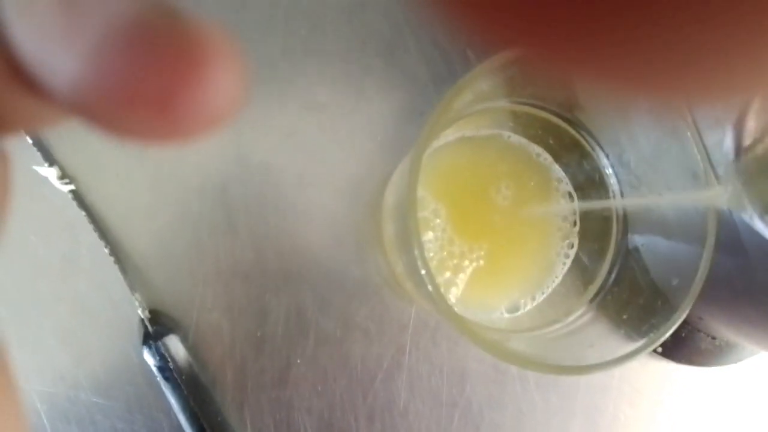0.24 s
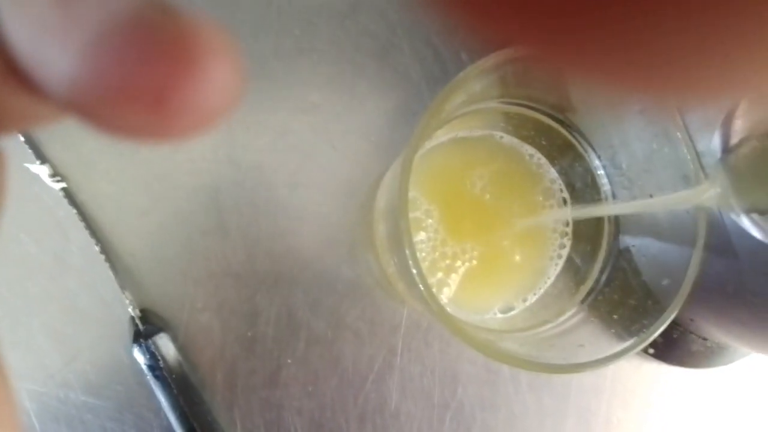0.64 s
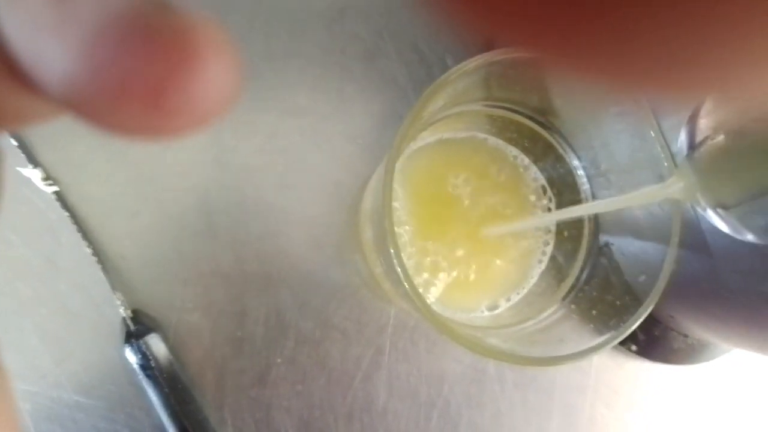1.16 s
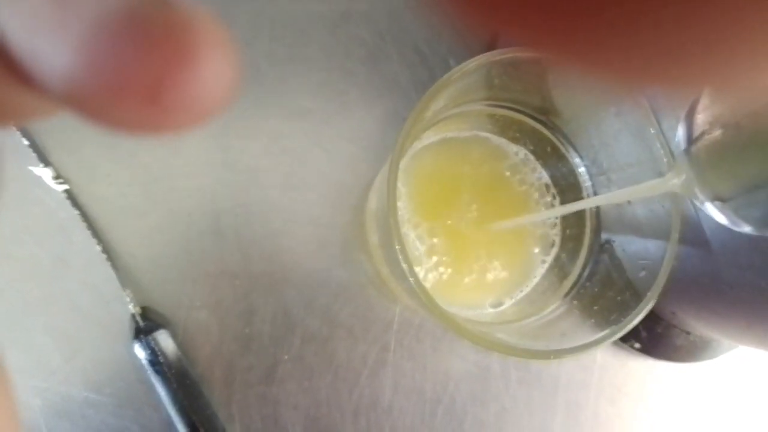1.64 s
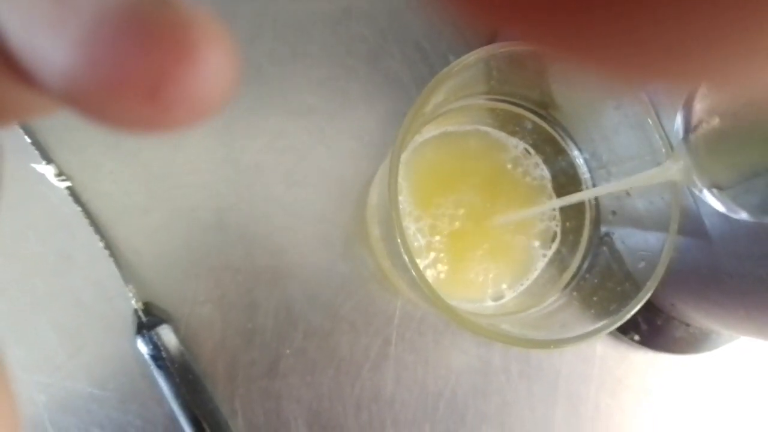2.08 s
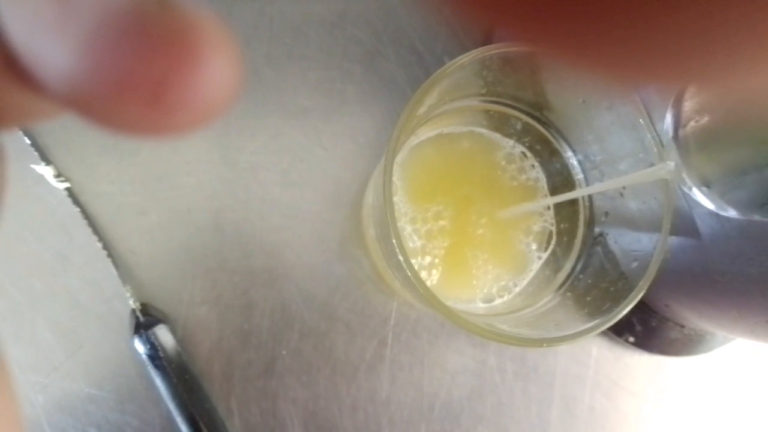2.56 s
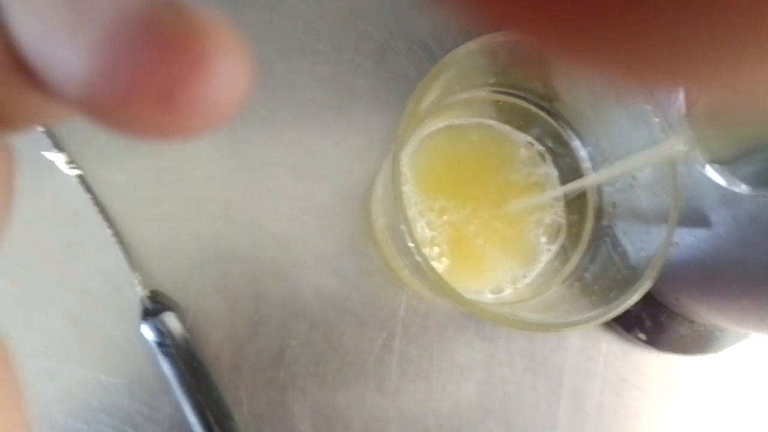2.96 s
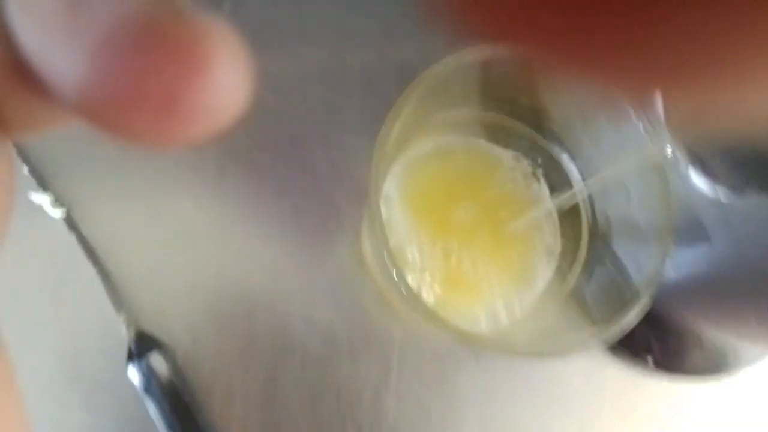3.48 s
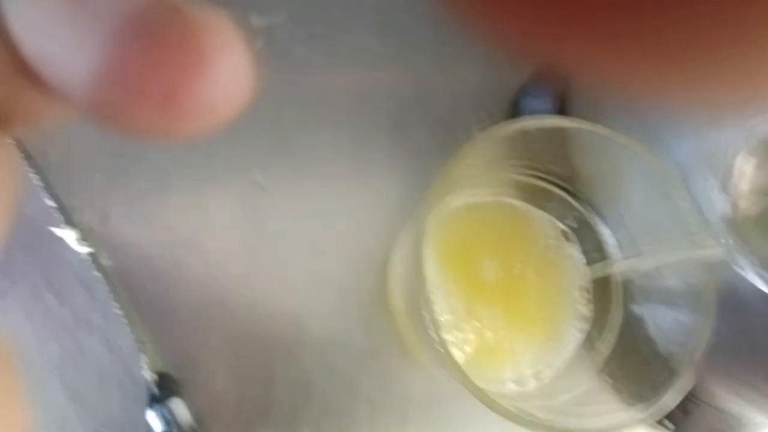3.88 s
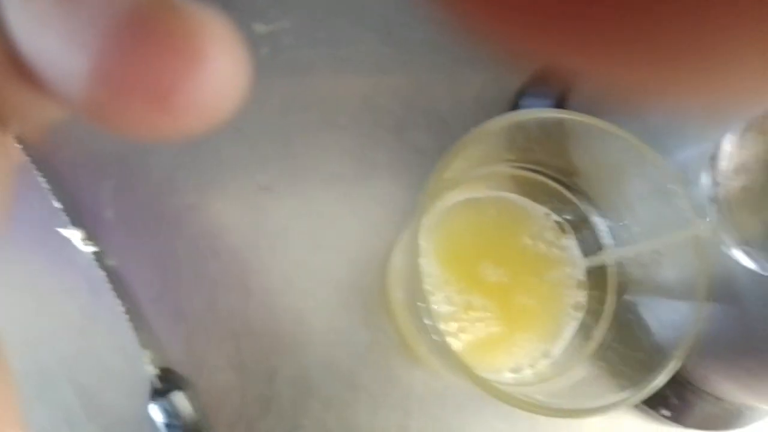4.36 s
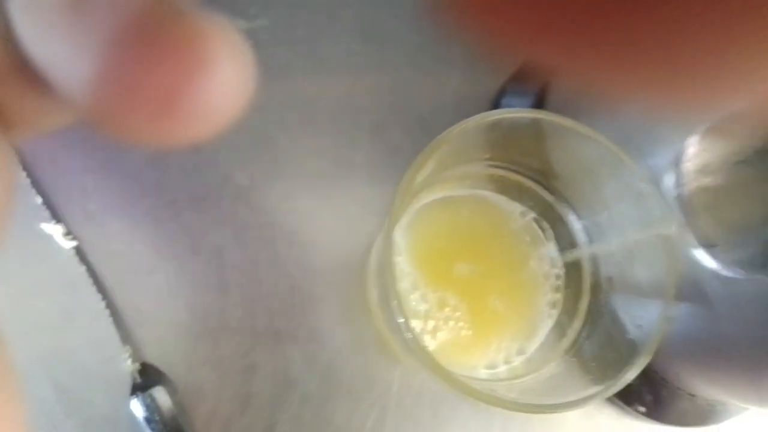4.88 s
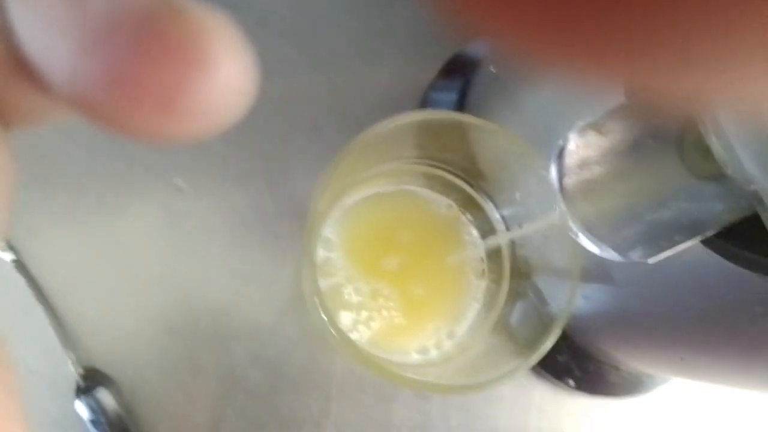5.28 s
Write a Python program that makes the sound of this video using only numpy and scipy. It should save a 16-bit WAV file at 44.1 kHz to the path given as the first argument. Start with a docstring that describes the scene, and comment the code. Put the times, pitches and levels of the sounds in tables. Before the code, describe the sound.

Close mono sound of a juicer on a steel worktop: gear whine, loose rattling teeth, dull knocks and crackling juice under a hand pressing fruit. A bright squelch opens it and another accompanies the stop near three seconds. Then near quiet, a brief cluster of bumps, scattered drops and froth pops, faint glass ringing and low room noise that swells slightly towards the end.

```python
"""Electric citrus juicer

A juicer runs for three seconds on a steel worktop in a small kitchen, then is bumped and rocks.
Gear meshing gives a whine from sine tones; loose teeth are random impulses exciting the housing modes.
The reamer tears wet pulp at the start and again around the stop: filtered grains in moving resonances.
Juice crackles, fizzes and drips into a glass: bursting bubbles are resonant pulses, and the faintly
ringing glass is a set of decaying sines. Soft room noise lies beneath.
"""
import sys
import numpy as np
from scipy import signal
from scipy.fft import rfft, irfft, next_fast_len
from scipy.io import wavfile
from scipy.ndimage import map_coordinates

SR = 44100
rng = np.random.default_rng(int(sys.argv[2]) if len(sys.argv) > 2 else 0)


def bounce(signal):
    """Save signal as a 16-bit WAV file at the path given by the first command-line argument."""
    frames = np.transpose(np.atleast_2d(signal))
    limited = np.clip(frames, -1, 1)
    pcm = np.round(limited * 32767).astype(np.int16)
    wavfile.write(sys.argv[1], SR, pcm)


N = 244311
TIME = np.arange(N) / SR
CUTOFF_HZ = 15650

# Spectrum of the room noise: [f/Hz, relative level/dB per Hz]
BACKGROUND_COLOUR = [(30, -73), (74, -10), (168, -26.5), (238, 1), (415, -3), (1050, -6.5), (1630, -13),
                     (2500, -24.5), (5500, -75)]
# Modes of the glass rung by the trickle: [t/s, f/Hz, level/dB, t60/s]
GLASS_RINGS = [(3.89, 4100, -70, 0.82), (3.936, 1555, -64.5, 1.7), (4.062, 3100, -67, .55),
               (4.384, 1553, -62, 0.48), (5.465, 6520, -66, .8)]
# Brief thickenings of the trickle: [t/s, half length/s, hiss level/dB]
GUSHES = [(4.327, 0.15, -70.5), (4.71, 0.047, -66)]
# Spectra of the crackling stream and of the froth: [f/Hz, relative level/dB per Hz]
CRACKLE = [(2500, -5), (4500, -1.5), (8000, 6.5), (11000, -2.5), (15500, 1)]
FIZZ = [(1060, -47), (1800, -8.5), (2950, -0.5), (4200, 2), (5550, -1), (7470, 9.5), (9110, 2),
        (11600, -11.5), (14800, 1), (15500, -29)]
# Course of the froth's fizz: [t/s, relative level/dB]
FROTH = [(3.38, -66.5), (3.95, -64), (4.15, -63.5), (4.32, -62), (4.5, -66), (4.71, -62), (5.04, -61.5),
         (5.16, -56.5), (5.54, -63)]
# Drops trapping a bubble: [t/s, level/dB, final f/Hz, share by which the pitch starts lower]
DROPS = [(3.095, -41, 3130, 0.056), (3.098, -50, 4600, 0.061), (3.135, -51, 3950, 0.071),
         (3.184, -47, 3150, .03), (3.212, -47, 1144, 0.093), (3.773, -51.5, 1600, .03),
         (3.842, -52.5, 3240, 0.26), (3.883, -58, 3480, 0.16), (3.938, -58, 1644, .03),
         (3.995, -53, 1205, 0.059), (4.07, -59, 2670, 0.2), (4.156, -57, 3480, 0.22),
         (4.766, -58, 2830, 0.5), (5.263, -59, 2450, .1)]
# Wet snaps of pulp and bursting froth: [t/s, click level/dB, ring level/dB, ring f/Hz]
SNAPS = [(0.105, -50, -22, 5700), (0.204, -32, -22.5, 6200), (0.2123, -27, -16, 6930),
         (0.251, -40, -37, 9200), (0.32, -47, -21.5, 7760), (0.364, -35, -28.5, 3620),
         (0.547, -38, -29, 7700), (0.63, -30, -31, 5200), (0.641, -33, -32, 5080),
         (0.647, -26, -27.5, 4950), (0.655, -35, -31, 5100), (0.767, -31, -33, 7000),
         (0.8918, -20.5, -25, 8340), (1.074, -39, -37.5, 6800), (1.309, -48, -33, 8700),
         (1.333, -50, -32.5, 9440), (1.7487, -27, -36, 8700), (1.907, -37, -30, 8210),
         (2.295, -17, -28, 8200), (2.347, -24.5, -30, 13330), (2.3817, -31, -40, 4800),
         (2.4297, -29, -33, 12300), (2.902, -43, -35, 7810), (2.993, -32, -27, 8400),
         (3.2378, -34, -35, 5300), (3.288, -32.5, -50, 7600), (3.387, -44, -46, 8700),
         (3.4402, -30, -30, 7930), (3.515, -32.5, -38, 8400), (3.52, -41, -60, 5200),
         (3.6005, -40, -43, 8300), (3.6613, -48, -37.5, 7800), (3.6926, -29.5, -43, 7500),
         (3.734, -36, -49, 6800), (3.774, -40, -48, 9200), (3.868, -37.5, -42, 13300),
         (3.9225, -43.5, -50, 14000), (4.073, -61, -39, 5700), (4.355, -38, -42, 6560),
         (5.11, -56, -41.5, 9200), (5.326, -31, -48, 4350), (5.469, -43, -44, 13600)]
# Squeaks of the reamer under the hand and as it comes to rest:
# [t/s, length/s, f/Hz, starting level/dB, fade/dB]
SQUEAKS = [(1.963, 0.23, 1996, -55, 12), (3.08, 0.22, 1413, -43, 20)]
# Touches as the juicer rocks on the worktop: [t/s, thud level/dB, clack level/dB]
BUMPS = [(3.687, -34.5, -52), (3.7, -33, -51), (3.708, -35, -51), (3.7119, -61, -33.5), (3.725, -35.5, -49),
         (3.743, -62, -38.5), (3.76, -48, -52), (3.782, -35.5, -47), (3.814, -48, -50)]
# Low and high modes of the rocking juicer: [f/Hz, relative level/dB, t60/s]
THUD_MODES = [(228, -15, 0.14), (289, -12, 0.16), (346, 1.5, 0.08), (427, -9.5, 0.083), (513, -1, 0.059),
              (595, -11, 0.055)]
CLACK_MODES = [(873, -13.5, 0.08), (1054, -2.5, 0.041), (1100, 0, 0.026)]
# Knocks of the reamer and gears under load: [t/s, peak level/dB, f/Hz]
KNOCKS = [(.53, -27, 1180), (0.568, -26, 1100), (.574, -32.5, 515), (.664, -35, 476), (.699, -33, 565),
          (.728, -34, 720), (0.875, -24.5, 1150), (0.906, -25.5, 941), (1.22, -39, 1593),
          (1.262, -27.5, 1150), (1.951, -29.5, 1054), (1.985, -25.5, 564), (2.014, -23.5, 1144),
          (2.748, -25.5, 522.3), (2.894, -35.5, 534), (2.954, -29.5, 650), (3.017, -31.5, 1650)]
# Reamer tearing into the fruit: [t/s, length/s, squelch level/dB, wet rasp level/dB]
PRESSES = [(-.06, 0.673, -39, -41), (2.755, 0.32, -36, -40.5)]
# Squelch spectrum of each press: [f/Hz, relative level/dB per Hz]
FIRST_SQUELCH = [(150, -30), (195, 1), (750, 10), (1400, 3), (2000, 2.5), (2800, -3), (3600, -31)]
LAST_SQUELCH = [(160, -24), (230, 2.5), (350, 8), (600, 12), (1000, 8.5), (1700, 7), (2100, -19.5),
                (3800, -7), (4800, -45.5)]
# Resonances of the wet gap between peel and reamer: [f/Hz, width per filter pass/Hz, relative level/dB]
FIRST_RASP = [(4950, 1200, 2), (5100, 1630, 12.5), (7000, 1050, 9.5), (7700, 800, 7), (8470, 380, 4)]
LAST_RASP = [(1990, 71, 21), (2484, 314, 6.5), (3090, 110, 9.5), (3470, 180, 1), (4100, 1200, -2),
             (6020, 340, 15.5), (6980, 150, 19), (7700, 600, 12), (8700, 5400, -7)]
# Hand leaning on the fruit: [t/s, length/s, extra rattle level/dB]
LEANS = [(0.33, 0.34, 3.5), (1.103, 0.21, 2), (1.953, 0.17, 3), (2.793, 0.24, 2.5)]
# Speed of the motor: [t/s, tooth-mesh f/Hz]
SPEED = [(0.0, 1249), (0.08, 1237), (0.43, 1226), (0.9, 1228), (1.07, 1221), (1.81, 1228), (2.83, 1236),
         (3.05, 1248)]
# Tones of the rotor: [multiple of its speed, relative level/dB]
ROTOR_TONES = [(13, -17.5), (16, -30.5), (18, -7.5), (39, -28)]
# Hum of the coils: [multiple of the mains frequency, level/dB]
HUM = [(2, -74), (4, -73), (6, -65)]
# Low and high resonances of the plastic housing: [f/Hz, width per filter pass/Hz, relative level/dB]
HOUSING_LOW = [(238.6, 37, -3), (311, 72, -7.5), (499, 79, 6), (595, 81, 8), (725, 300, -4)]
HOUSING_HIGH = [(877, 156, 3), (1138, 68, 11.5), (1249, 154, -2), (1338, 28, 9.5), (1580, 310, -9),
                (1990, 510, -17.5), (2686, 540, -21), (4970, 1140, -14.5)]

# trickle and room noise swell together towards the end
BACKGROUND_DB = -64.5
SWELL_S, SWELL_RISE_S, SWELL_DB = 4.69, 0.41, 6
GURGLE_DB = -76.5
# juice in the glass: starting level while the reamer turns, thin trickle afterwards
FLOW_DB, TRICKLE_DB, FLOW_GROWTH_DB_PER_S = -59, -71.5, 1.35
# a press swells, weakens as the pulp gives way, and lets go
PRESS_ATTACK_S, PRESS_RELEASE_S = 0.047, 0.096
# cells tear only under firm pressure, so the rasp starts later and ends sooner
RASP_LAG_S, RASP_SHORTER_S, RASP_RELEASE_S = 0.0068, 0.035, 0.058
LEAN_ATTACK_S, LEAN_RELEASE_S = 0.0058, 0.12
# the hand slackens after the first press and the low rumble drops for a moment
SLACK_S, SLACK_LENGTH_S, SLACK_DB = 0.802, 0.16, -7.5
# at switch-off the motor's tones die away fast; the rattle and the flow of juice more slowly
STOP_S, MOTOR_FALL_DB_PER_S = 2.965, 185
COAST_S, RATTLE_FALL_DB_PER_S, FLOW_FALL_DB_PER_S = 0.078, 71, 76
MESH_TEETH, MAINS_HZ, SLOW_GEAR_RATIO = 26, 50, 0.868
# the whine grows as the load drags the speed below its free value
FREE_HZ, WHINE_DB, WHINE_DB_PER_HZ = 1248, -42.5, 0.2728
# the rotor's other tones ease off as the fruit empties, and rise when the hand leans on it
ROTOR_DB, ROTOR_EASE_DB_PER_S, ROTOR_FOLLOWS = -34, 3, 1
# loose teeth rattle in the housing, and the coils hum a little louder under load
RUMBLE_DB, RATTLE_DB, HUM_FOLLOWS = -47.5, -44.5, 0.82


def from_db(db):
    """Logarithmic level: decibels to amplitude gain."""
    return 10 ** (np.asarray(db) / 20)


def rms_one(x):
    """Normalisation: scale to unit rms."""
    return x / np.sqrt(np.mean(x ** 2) + 1e-20)


def in_time(rows):
    """Linear interpolation of a two-column curve at every sample."""
    times, values = np.transpose(rows)
    return np.interp(TIME, times, values)


def gesture(s, length, attack, release):
    """Trapezoidal envelope: rises from 0 to 1 at time s, holds until its length is over, falls back."""
    rise = (TIME - s) / attack
    fall = 1 - (TIME - s - length) / release
    return np.clip(np.minimum(rise, fall), 0, 1)


def run_down(s, db_per_s):
    """Exponential decay: full gain until time s, then a steady fall in dB."""
    return from_db(-db_per_s * np.maximum(TIME - s, 0))


def swell():
    """Linear ramp in level: the late rise of the quiet sounds, in dB."""
    return SWELL_DB * np.clip((TIME - SWELL_S) / SWELL_RISE_S, 0, 1)


def drift(rate):
    """Low-pass filtered random motion of unit spread, computed at every 40th sample."""
    r = np.exp(-80 * np.pi * rate / SR)
    noise = rng.standard_normal(N // 40 + 2002)
    slow = signal.lfilter([1], [1, -2 * r, r * r], noise)[2000:]  # skip the settling
    return np.interp(np.arange(N) / 40, np.arange(len(slow)), rms_one(slow))


def grains(per_s, spread_db):
    """Random point process: clicks of either sign, many small and a few large."""
    sizes = from_db(spread_db * np.minimum(rng.exponential(1, N), 4.5))
    return (rng.random(N) < per_s / SR) * sizes * rng.choice([-1, 1], N)


def coloured(x, spectrum):
    """Minimum-phase (causal) filtering by the folded cepstrum of a given spectrum; rms 1."""
    size = 2 * next_fast_len(N // 2 + SR // 4)
    hz, db = np.transpose(spectrum)
    grid = np.maximum(np.arange(size // 2 + 1) * SR / size, 1)
    gain = from_db(np.interp(np.log(grid), np.log(hz), db))
    cepstrum = irfft(np.log(gain))
    cepstrum[size // 2:] = 0
    return rms_one(irfft(rfft(x, size) * np.exp(2 * rfft(cepstrum)))[:N])


def resonance(x, hz, width_hz):
    """Damped resonator applied twice for steep skirts; gain 1 on top."""
    r = np.exp(-np.pi * width_hz / SR)
    section = [(1 - r * r) / 2, 0, (r * r - 1) / 2, 1, -2 * r * np.cos(2 * np.pi * hz / SR), r * r]
    return signal.sosfilt([section, section], x + 1e-18)


def body(x, modes):
    """Modal superposition: resonances side by side, alternating in sign; rms 1."""
    return rms_one(sum((-1) ** k * from_db(db) * resonance(x, hz, width)
                       for k, (hz, width, db) in enumerate(modes)))


def bubble_bank(bursts, pitches, width_share):
    """Independent resonators: each burst is dealt at random to one pitch."""
    dealt = rng.integers(0, len(pitches), N)
    return sum(resonance(bursts * (dealt == k), hz, width_share * hz) for k, hz in enumerate(pitches))


def wander(x, share, rate, glide):
    """Doppler-like reading at varying speed: pitch drifts by a small share around a given glide."""
    ahead = np.cumsum(share * drift(rate) + glide)
    return map_coordinates(x, [np.arange(N) + ahead], order=3, mode="wrap")


def low_cut(x, hz):
    """Radiation limit: small bodies radiate no bass."""
    return signal.sosfilt(signal.butter(6, hz, "high", fs=SR, output="sos"), x + 1e-18)


def add(out, s, sound):
    """Superposition: mix a short sound in at time s."""
    start = int(np.clip(s * SR, 0, N - 1))
    out[start:start + len(sound)] += sound[:N - start]


def background():
    """Stationary noise shaped by a spectrum: soft room noise that swells towards the end."""
    return from_db(BACKGROUND_DB + swell()) * coloured(rng.standard_normal(N), BACKGROUND_COLOUR)


def kitchen(x, t60, wet_db, wall_cut_hz=3000):
    """Diffuse reverberation: exponentially decaying noise, duller than the direct sound."""
    t = TIME[:SR // 2]
    tail = rng.standard_normal(len(t)) * from_db(-60 * t / t60) * (t > .004)
    tail = signal.sosfilt(signal.butter(1, wall_cut_hz, fs=SR, output="sos"), tail)
    return x + from_db(wet_db) * signal.fftconvolve(x, tail / np.sqrt(np.sum(tail ** 2)))[:N]


def glass(attack_s=0.015, slosh=0.21, flutter_db=3.5):
    """Damped free vibration: the trickle rings a glass mode, and the moving juice makes it waver."""
    out = np.zeros(N)
    for s, hz, db, t60 in GLASS_RINGS:
        age = np.maximum(TIME - s, 0)
        level = (1 - np.exp(-age / attack_s)) * from_db(db - 60 * age / t60 + flutter_db * drift(25))
        out += level * np.sin(2 * np.pi * hz * age + slosh * drift(30))
    return out


def gurgle(bubbles_per_s=260, low_hz=2300, high_hz=5200, gush_hz=4300, gush_width_hz=1900):
    """Bubble resonance: larger bubbles tick in the glass; the trickle hisses when it thickens."""
    bursts = grains(bubbles_per_s, spread_db=4.0)
    ticks = rms_one(bubble_bank(bursts, np.geomspace(low_hz, high_hz, 10), width_share=0.1))
    gush = sum(from_db(db) * np.exp(-((TIME - s) / half_length) ** 2) for s, half_length, db in GUSHES)
    hiss = rms_one(resonance(rng.standard_normal(N), gush_hz, gush_width_hz))
    return from_db(GURGLE_DB) * ticks + gush * hiss


def juice(crackle_db=-3.5, spatter_db=0.5, fizz_db=-2.5, pressing_per_s=450, resting_per_s=110,
          flicker_db=4.0):
    """Bubble collapse: tiny bubbles burst at assorted pitches amid soft spatter and a smooth fizz."""
    flow = run_down(STOP_S + COAST_S, FLOW_FALL_DB_PER_S)
    pouring = flow * from_db(FLOW_DB + FLOW_GROWTH_DB_PER_S * TIME)
    trickle = (1 - flow) * from_db(TRICKLE_DB + swell())
    bursts = grains(resting_per_s + (pressing_per_s - resting_per_s) * flow, spread_db=3.0)
    pops = bubble_bank(bursts, np.geomspace(4500, 15000, 12), width_share=0.25)
    crackle = from_db(crackle_db) * coloured(pops + 0.032 * bursts, CRACKLE)
    spatter = from_db(spatter_db + flicker_db * drift(83)) * coloured(rng.standard_normal(N), CRACKLE)
    fizz = from_db(in_time(FROTH) + fizz_db) * coloured(rng.standard_normal(N), FIZZ)
    return (pouring + trickle) * (crackle + spatter) + fizz


def drops(ring_t60=0.031, glide_s=0.0036, attack_s=0.0017, splash_db=-6, splash_t60=0.018,
          splash_width_hz=3200):
    """Bubble resonance: a drop splashes; its trapped bubble rises in pitch as it nears the surface."""
    out, t = np.zeros(N), TIME[:SR // 8]
    onset = (1 - np.exp(-t / attack_s)) ** 2
    for (s, db, hz, rise), noise in zip(DROPS, rng.standard_normal((len(DROPS), len(t)))):
        phase = 2 * np.pi * np.cumsum(hz * (1 - rise * np.exp(-t / glide_s))) / SR
        level = from_db(-60 * t / ring_t60) * onset
        ring = level / level.max() * np.sin(phase)
        splash = resonance(noise * onset * from_db(-60 * t / splash_t60), hz, splash_width_hz)
        add(out, s, from_db(db) * (ring + from_db(splash_db) * splash / np.abs(splash).max()))
    return out


def snaps(click_t60=0.0008, click_edge_share=0.59, spray=0.051, spray_t60=0.031, ring_t60=0.0099,
          swell_s=0.00067, splash=1.23, splash_width_hz=4800):
    """Film rupture and cavity resonance: a click with spray, then a brief ring of the pocket below."""
    out, t = np.zeros(N), TIME[:SR // 25]
    air = signal.butter(4, CUTOFF_HZ, fs=SR, output="sos")
    for (s, click_db, ring_db, hz), noise in zip(SNAPS, rng.standard_normal((len(SNAPS), len(t)))):
        # smaller pockets click brighter
        bright = signal.butter(3, min(click_edge_share * hz, SR / 3), "high", fs=SR, output="sos")
        burst = noise * (from_db(-60 * t / click_t60) + spray * from_db(-60 * t / spray_t60))
        click = signal.sosfilt(air, signal.sosfilt(bright, burst))
        envelope = from_db(-60 * t / ring_t60) * (1 - np.exp(-t / swell_s))
        pocket = envelope * (np.sin(2 * np.pi * hz * t) + splash * resonance(noise, hz, splash_width_hz))
        add(out, s, from_db(click_db) * click / np.abs(click).max()
            + from_db(ring_db) * pocket / np.abs(pocket).max())
    return out


def squeaks(waver=1.8, flutter_db=4.5):
    """Frictional tone with random phase and level: reamer squeaks that set in quickly and fade."""
    out = np.zeros(N)
    for s, length, hz, db, fade_db in SQUEAKS:
        age = np.clip((TIME - s) / length, 0, 1)
        edges = np.minimum(1, 10 * np.minimum(age, 1 - age))
        level = edges * from_db(db - fade_db * age + flutter_db * drift(64.6))
        out += level * np.sin(2 * np.pi * hz * TIME + waver * drift(27))
    return out


def bumps(detune=0.045, contact_s=0.00079, scuff_t60=0.096, scuff_db=-21, splash_db=-20):
    """Impact excitation of modes, detuned as the juicer tilts, with a scuff and shaken juice."""
    rings, judder, t = np.zeros(N), np.zeros(N), TIME[:SR // 4]
    contact = 1 - np.exp(-t / contact_s)
    for s, thud_db, clack_db in BUMPS:
        for hit_db, modes in ((thud_db, THUD_MODES), (clack_db, CLACK_MODES)):
            for hz, db, t60 in modes:
                pitch = hz * (1 + detune * rng.standard_normal())
                level = contact * from_db(hit_db + db - 60 * t / t60)
                add(rings, s, level * np.sin(2 * np.pi * pitch * t))
        add(judder, s, from_db(thud_db) * rng.standard_normal(len(t)) * from_db(-60 * t / scuff_t60))
    scuff = from_db(scuff_db) * resonance(judder, 2600, 9000)
    shaken = coloured(judder * grains(3300, spread_db=2), CRACKLE)
    return rings + scuff + judder.std() * from_db(splash_db) * shaken


def knocks(ring_width_hz=150, click_share=0.13, click_width_hz=900):
    """Impulse response of a resonator: a dull knock swells over a few cycles in part of the housing."""
    out, click = np.zeros(N), signal.unit_impulse(SR // 10)
    for s, db, hz in KNOCKS:
        edge = click_share * ring_width_hz / click_width_hz * resonance(click, hz, click_width_hz)
        knock = resonance(click, hz, ring_width_hz) + edge
        add(out, s, from_db(db) * knock / np.abs(knock).max())
    return out


def press(row, squelch_colour, rasp_modes, squelch_sag_db, rasp_sag_db, rasp_attack_s, wander_share,
          rise_share, patchy_db=1.1, pops_db=-13, pops_hz=8200):
    """Friction and rupture: ribs squelch on peel, cells tear in a bright rasp; both sag as pulp yields."""
    s, length, squelch_db, rasp_db = row
    spent = np.clip((TIME - s) / length, 0, 1) ** 2
    squelch = coloured(grains(3500, spread_db=3.0) * from_db(2.25 * drift(23)), squelch_colour)
    tears = grains(7500, spread_db=4.2) * from_db(1.7 * drift(70))
    pops = from_db(pops_db) * rms_one(resonance(grains(68, spread_db=4.0), pops_hz, 2000))
    # a positive rise_share lifts the resonances as the gap narrows
    glide = rise_share * (np.sqrt(spent) - .5)
    # as the gap fills and empties, each resonance swells and shifts on its own
    rasp = rms_one(sum(from_db(db + patchy_db * drift(6.4))
                       * wander(resonance(tears, hz, width), wander_share, 5, glide)
                       for hz, width, db in rasp_modes))
    rubbing = gesture(s, length, PRESS_ATTACK_S, PRESS_RELEASE_S)
    tearing = gesture(s + RASP_LAG_S, length - RASP_SHORTER_S, rasp_attack_s, RASP_RELEASE_S)
    low = rubbing * from_db(squelch_db - squelch_sag_db * spent) * squelch
    high = tearing * from_db(rasp_db - rasp_sag_db * spent) * (rasp + pops)
    return low + high


def gears(rough=0.32, ripple=0.2, wobble=0.094, sway=0.06, chafe_db=-64, chafe_hz=1950,
          chafe_width_hz=1100):
    """Periodic meshing, modulated by torque, and random tooth impacts filtered by the housing modes."""
    mesh_hz = in_time(SPEED)
    lean_db = sum(db * gesture(s, length, LEAN_ATTACK_S, LEAN_RELEASE_S) for s, length, db in LEANS)
    turn = 2 * np.pi * np.cumsum(mesh_hz / MESH_TEETH) / SR
    mains = 2 * np.pi * MAINS_HZ * TIME

    def tone(order):
        """Harmonic of the rotor speed with random amplitude and phase modulation."""
        carrier = np.sqrt(2) * np.sin(order * turn + rough * drift(55))
        return carrier * (1 + 0.88 * rough * drift(54.0))

    # torque pulses at twice the mains rate, the rotor binds twice a turn, a slower gear sways the load
    torque = 1 + ripple * np.cos(2 * mains) + wobble * np.cos(2 * turn) + sway * np.cos(SLOW_GEAR_RATIO * turn)
    whine = from_db(WHINE_DB + WHINE_DB_PER_HZ * (FREE_HZ - mesh_hz)) * torque * tone(MESH_TEETH)
    rotor_db = ROTOR_DB - ROTOR_EASE_DB_PER_S * TIME + ROTOR_FOLLOWS * lean_db
    rotor = from_db(rotor_db) * torque * sum(from_db(db) * tone(order) for order, db in ROTOR_TONES)
    hum_gain = from_db(2.0 * drift(1.2) + HUM_FOLLOWS * (lean_db - lean_db.mean()))
    hum = hum_gain * sum(np.sqrt(2) * from_db(db) * np.sin(order * mains) for order, db in HUM)
    # rubbing noise that peaks once a turn
    rub = rng.standard_normal(N) * (1 + np.cos(turn)) ** 2
    chafe = from_db(chafe_db) * rms_one(resonance(rub, chafe_hz, chafe_width_hz))
    teeth = grains(2200, spread_db=1.0) * np.sqrt(np.abs(torque)) * from_db(2.36 * drift(8.4))
    slack_db = SLACK_DB * gesture(SLACK_S, SLACK_LENGTH_S, LEAN_RELEASE_S, LEAN_RELEASE_S)
    rumble = from_db(RUMBLE_DB + slack_db) * body(teeth, HOUSING_LOW)
    rattle = from_db(lean_db) * (rumble + from_db(RATTLE_DB) * body(teeth, HOUSING_HIGH))
    return ((whine + rotor + chafe) * run_down(STOP_S, MOTOR_FALL_DB_PER_S)
            + hum * run_down(STOP_S + COAST_S, MOTOR_FALL_DB_PER_S)
            + rattle * run_down(STOP_S + COAST_S, RATTLE_FALL_DB_PER_S))


def scene():
    """Superposition of room, juice, fruit and juicer in one channel."""
    small = kitchen(low_cut(snaps() + drops() + knocks() + squeaks(), hz=217), t60=0.081, wet_db=-10.0)
    thump = kitchen(low_cut(bumps(), hz=192), t60=0.33, wet_db=-10.5)
    first = press(PRESSES[0], FIRST_SQUELCH, FIRST_RASP, squelch_sag_db=2.0, rasp_sag_db=2.0,
                  rasp_attack_s=0.19, wander_share=0.013, rise_share=0.069)
    last = press(PRESSES[1], LAST_SQUELCH, LAST_RASP, squelch_sag_db=4.5, rasp_sag_db=12,
                 rasp_attack_s=0.1, wander_share=0.012, rise_share=0)
    wet = glass() + gurgle() + juice()
    return (background() + wet + small + thump + first + last + gears())[None]


def record(dry):
    """Band limitation: an elliptic low-pass cuts the top steeply."""
    return signal.sosfilt(signal.ellip(10, .2, 80, CUTOFF_HZ, fs=SR, output="sos"), dry)


dry = scene()
out = record(dry)
bounce(out)
```